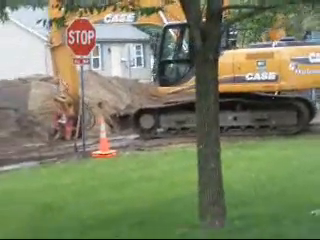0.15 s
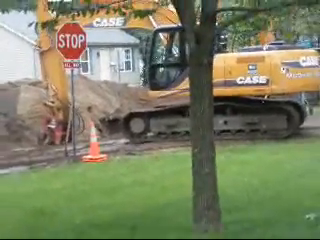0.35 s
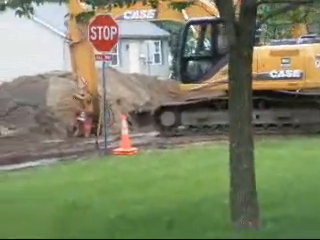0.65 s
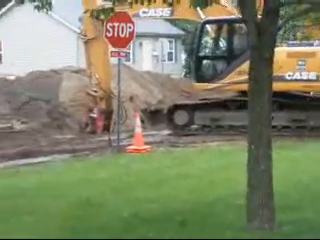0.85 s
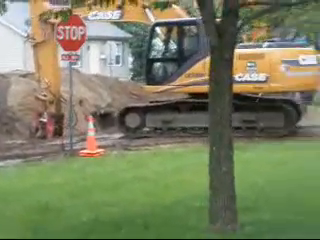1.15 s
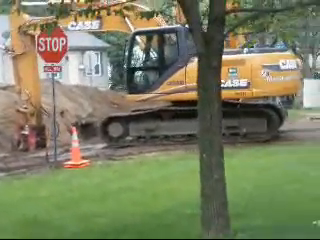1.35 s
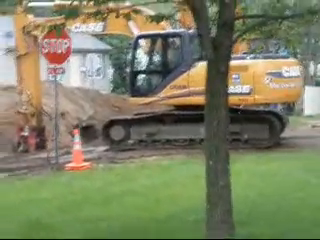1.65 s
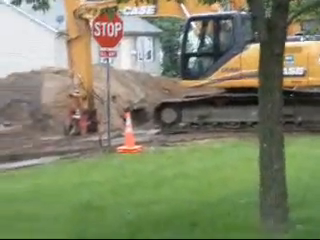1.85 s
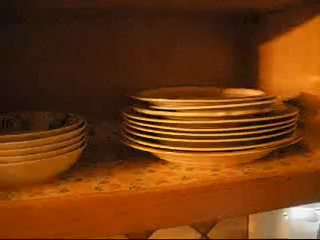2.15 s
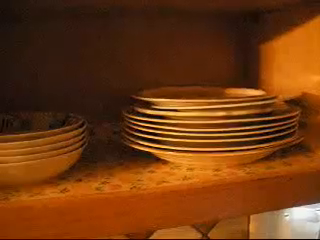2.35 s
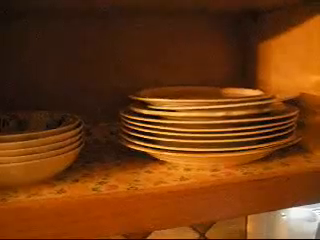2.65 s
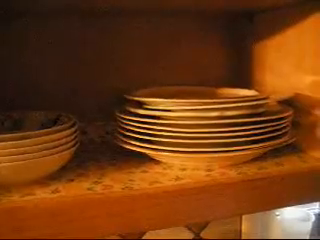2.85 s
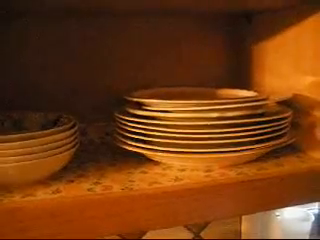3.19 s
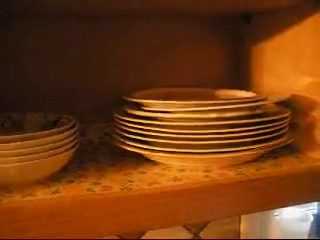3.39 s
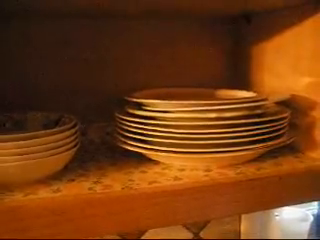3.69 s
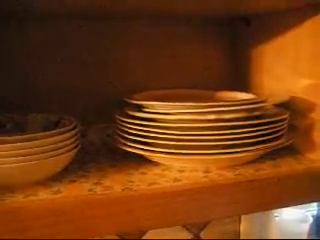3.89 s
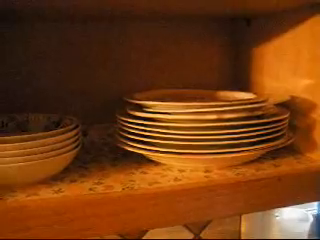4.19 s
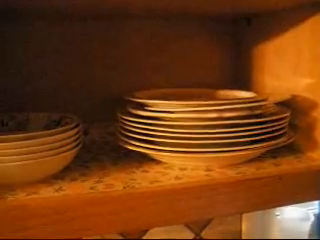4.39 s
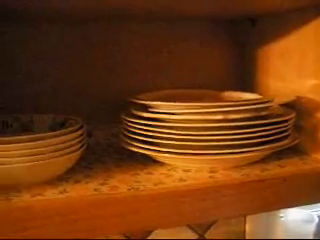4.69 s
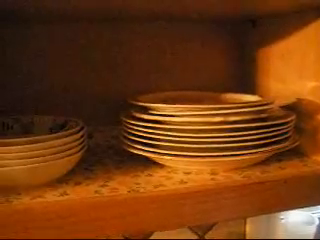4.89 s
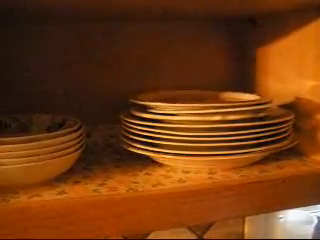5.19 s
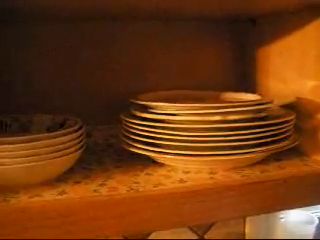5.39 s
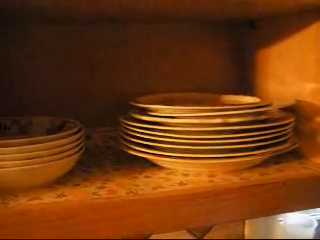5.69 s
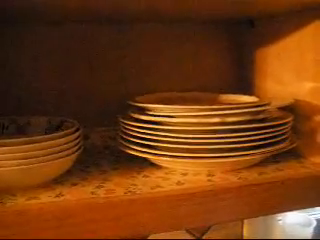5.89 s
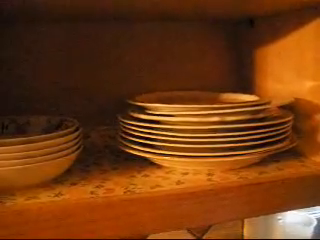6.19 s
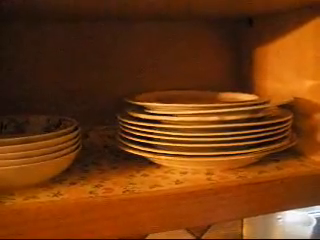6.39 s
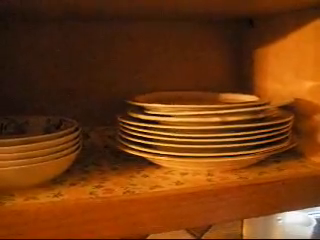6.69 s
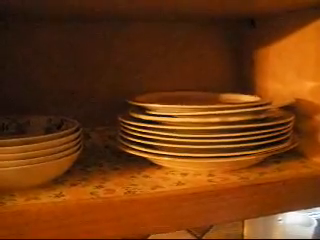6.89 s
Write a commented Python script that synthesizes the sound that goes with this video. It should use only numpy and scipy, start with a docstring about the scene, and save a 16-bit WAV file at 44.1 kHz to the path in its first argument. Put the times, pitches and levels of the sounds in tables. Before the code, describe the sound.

Outdoors, an excavator's vibrating hammer pounds at a rapid, blurred rate, loud and harsh, with chattering steel, sharp clanks, short squeaks and a whine as it slows. An abrupt cut goes inside a house: a stack of plates rattles quickly in a cupboard over a muffled drone, then fades to low hum and wood buzz before scattered clinks return. Small microphone, slightly clipped, with little deep bass.

```python
"""A vibrating hammer on an excavator pounds the ground: rapid blows, chattering steel, clanks, squeaks, a whine.
Then, abruptly, one hears the inside of a house: a drone through the wall and a rattling stack of plates.
The rattle dies away to the drone and the hum of an idling engine, then stray knocks return.
Blows, contacts and landings are impulses or noise bursts that excite resonances and coloured responses;
steady tones are sines that follow the blow rate, the shaking rate or an engine pitch."""
import sys
import numpy as np
from scipy import signal
from scipy.fft import rfft, irfft
from scipy.io import wavfile
from scipy.ndimage import uniform_filter1d

SR = 44100
rng = np.random.default_rng(int(sys.argv[2]) if len(sys.argv) > 2 else 0)


def digitize_waveform(pressure):
    """Quantize a signal to 16-bit integers and store it at the path in sys.argv[1].

    Rows of a 2-D input are taken as channels; values are limited to [-1, 1].
    """
    field = np.atleast_2d(pressure).T
    bounded = np.clip(field, -1, 1)
    quanta = np.round(bounded * 32767).astype(np.int16)
    wavfile.write(sys.argv[1], SR, quanta)


N = 310905
T = np.arange(N) / SR  # time in s

CUT_S = 2.216  # the street gives way to the house
# Resonances of the steel housing: centre_hz, width_hz, level_db (relative)
HOUSING_MODES = [(610, 51, -18), (740, 25, 0), (879, 96, 6.5), (1264, 450, 5.5), (1817, 25, 8)]
# Spectrum of the ground's response: frequency_hz, level_db (relative)
GROUND_SPECTRUM = [(30, -77), (50, -26), (70, -12), (100, 3), (175, 3.5), (240, 1), (330, 6.5), (480, 4.5),
                   (800, 14), (2000, -54)]
# Spectrum of loose steel: frequency_hz, level_db (relative)
STEEL_SPECTRUM = [(150, -26), (450, -4), (800, 5), (1020, -4.5), (1350, 2), (1850, 0.5), (2400, -3),
                  (3050, -9.5), (3550, -8), (4000, -11), (5100, -11.5), (6200, -9), (10000, -13),
                  (12500, -24)]


def undb(db):
    """Logarithmic level: decibels become an amplitude ratio."""
    return 10 ** (np.asarray(db) / 20)


def unit(x):
    """Normalisation of mean power: scale to rms 1."""
    return x / np.sqrt(np.mean(x ** 2))


def curves(table):
    """Linear interpolation: the columns of a table as curves over the time in its first column."""
    s, *columns = np.transpose(table)
    return [np.interp(T, s, column) for column in columns]


def ramp(start_s, length_s):
    """Linear envelope: a straight rise from 0 to 1."""
    return np.clip((T - start_s) / length_s, 0, 1)


def swell(start_s, attack_s, hold_s, release_s):
    """Trapezoidal envelope: attack, hold and release, from 0 to 1 and back."""
    return ramp(start_s, attack_s) - ramp(start_s + attack_s + hold_s, release_s)


def walk(rate):
    """Low-pass noise: random levels held for 1 / rate s, then smoothed twice by a moving average."""
    hold = int(SR / rate)
    held = rng.standard_normal(size=1000)[np.arange(N) // hold]
    return 1.3 * uniform_filter1d(uniform_filter1d(held, hold), hold)


def tone(hz):
    """Phase is the integral of frequency: a sine of rms 1 that follows a pitch curve."""
    cycles = np.cumsum(hz) / SR + rng.random()
    return np.sqrt(2) * np.sin(2 * np.pi * cycles)


def through(x, response):
    """Linear filtering: convolve a sound with an impulse response."""
    return signal.fftconvolve(x, response)[:len(x)]


def colour(points, size=4096):
    """Minimum phase by folding the cepstrum: a causal impulse response with the given spectrum."""
    hz, db = np.transpose(points)
    f = np.maximum(np.arange(size // 2 + 1) * SR / size, 1)
    magnitude = undb(np.interp(np.log(f), np.log(hz), db))
    cepstrum = irfft(np.log(magnitude))
    cepstrum[1:size // 2] *= 2
    cepstrum[size // 2 + 1:] = 0
    return irfft(np.exp(rfft(cepstrum)))


def ring(modes, size=6000):
    """Modal superposition: damped sines, each decaying faster the wider its resonance."""
    t = T[:size]
    response = np.zeros(size)
    for hz, width, db in modes:
        response += undb(db) * width * np.exp(-np.pi * width * t) * np.sin(2 * np.pi * hz * t)
    return response


def echoes(t60, wet_db, size=22050):
    """Diffuse reverberation: the direct sound and a noise tail falling 60 dB in t60 seconds."""
    t = T[:size]
    tail = rng.standard_normal(size) * np.exp(-np.log(1000) * t / t60) * (1 - np.exp(-t / 0.0079))
    return (t == 0) + undb(wet_db) * tail / np.linalg.norm(tail)


def smear(x, t60, wet_db):
    """All-pass dispersion: many paths spread a sound in time without colouring it."""
    paths = rfft(echoes(t60, wet_db), N)
    return irfft(rfft(x) * paths / np.abs(paths), N)


def contacts(per_s, spread_db):
    """Random point process: a stream of tiny collisions of either sign and uneven strength."""
    happens = rng.random(N) < per_s / SR
    sign = rng.choice([-1, 1], N)
    return happens * sign * undb(spread_db * np.minimum(rng.exponential(size=N), 4))


def add(out, s, sound):
    """Superposition: mix a sound in at time s."""
    i = max(int(s * SR), 0)
    out[i:i + len(sound)] += sound[:max(N - i, 0)]


def idling_engine():
    """Narrow-band lines: mains hum and idling engine as tones of wavering level and pitch."""
    # frequency_hz, level_db (rms before wavering)
    lines = [(59.6, -56), (269.2, -57), (538.3, -58.5), (592.2, -88), (815, -60)]
    return sum(undb(db + 2 * walk(4.37)) * tone(hz * (1 + 0.00638 * walk(12))) for hz, db in lines)


def ground_hum(rate):
    """Harmonic radiation: tones at whole multiples of the shaking rate."""
    # multiple of the shaking rate, level_db (relative)
    orders = [(3, -7), (4, 0.5), (7, -15), (8, -23), (9, -17)]
    return unit(sum(undb(db + 0.42 * walk(8.1)) * tone(k * rate) for k, db in orders))


def wall_drone():
    """Transmission loss: noise coloured by the wall, its level wandering slowly."""
    # Sound through the wall: frequency_hz, level_db (relative)
    wall_spectrum = [(25, -18), (45, -16), (70, -7), (140, -1.5), (200, -4), (270, 2.5), (350, 1.5),
                     (470, -5), (590, 1.5), (690, -5.5), (820, -5.5), (1100, -5.5), (2500, -22.5)]
    return unit(through(rng.standard_normal(N), colour(wall_spectrum))) * undb(walk(6.8))


def woodwork_buzz(shake):
    """Intermittent contact: shaken joints strike the resonances of boards and doors."""
    # Cupboard boards and doors: centre_hz, width_hz, level_db (relative)
    wood_modes = [(864, 69, 9), (954, 44, 9), (1180, 89, 11), (1482, 310, 11.5), (1640, 130, 1.5),
                  (1890, 53, 3), (2440, 60, -43.5)]
    return unit(through(shake * contacts(per_s=1800, spread_db=1.5), ring(wood_modes)))


def fine_fizz(shake):
    """Broadband excitation: steady noise and shaken contacts share one coloured spectrum."""
    # frequency_hz, level_db (relative)
    fizz_spectrum = [(800, -14.5), (2400, 2), (4000, -4.5), (6500, -3.5), (9500, -5), (12500, -20.5)]
    grains = unit(contacts(per_s=1600, spread_db=4.5))
    return unit(through(rng.standard_normal(N) + 0.7 * shake * grains, colour(fizz_spectrum)))


def house(shake_s=2.318, fizz_db=-0.5, fizz_follows=.3):
    """Structure-borne sound: drone and hum pass wall and floor, and contacts buzz at the shaking rate."""
    # How hard the machine shakes the house: time_s, drone_db (relative)
    drone_levels = [(2.32, -44.5), (2.45, -43), (3.6, -44.5), (4.2, -44.5), (4.66, -46.5), (5.15, -50.5),
                    (5.84, -50.5), (5.93, -44.5), (6.06, -45), (6.25, -40), (6.57, -38.5), (6.8, -45),
                    (7.05, -44.5)]
    # Woodwork wedges tight, then loosens in surges: time_s, buzz_db (relative to the drone)
    looseness = [(2.9, 0), (3.3, -4.5), (3.95, -8), (4.03, 5.5), (4.4, 1.5), (4.67, 6.5), (4.8, 0),
                 (7.05, 1)]
    # time_s, shaking_rate_hz, hum_db (rms of the ground hum)
    shaking = [(2.3, 32.66, -68), (3.9, 32.9, -53.5), (4.65, 36.95, -53), (4.9, 35.05, -63),
               (5.95, 31, -61.5), (6.27, 31.73, -46.5), (7.05, 35.82, -42.5)]
    drone_db, loose_db = curves(drone_levels) + curves(looseness)
    rate, hum_db = curves(shaking)
    shake = 1 + 0.06 * np.cos(2 * np.pi * np.cumsum(rate) / SR)
    shaken = wall_drone() * undb(drone_db + 3.0)
    shaken += woodwork_buzz(shake) * undb(drone_db + loose_db + 1)
    # the fizz follows only a share of the looseness
    shaken += fine_fizz(shake) * undb(drone_db + fizz_follows * loose_db + fizz_db)
    shaken += ground_hum(rate) * undb(hum_db)
    return shaken * undb(np.where(T < shake_s, -10, 0)) + idling_engine()


def landings(start_s=2.3782, period_s=.06055, end_s=4.16, rebound_s=.021, rebound_db=-12, late_s=.0028):
    """Periodic impact with rebound: (time_s, relative level_db) of rocking landings, then stray knocks."""
    # time_s, full_db (relative), weak_shortfall_db, weak_rebound_db (relative to a full landing)
    rocking = [(2.38, -16.5, -1, -6), (2.45, -18.5, -1.5, -1.5), (2.62, -16.5, 6, -1),
               (2.75, -16.2, 5.5, -3.5), (2.87, -17, 16, -3), (3.0, -14, 11, -13), (3.22, -14.5, 19.5, -13),
               (3.29, -17.5, 12, -25), (3.4, -25.5, 1, -15), (3.58, -28.5, -1, -7), (3.72, -26, 0, -18),
               (3.97, -25, 2, -12), (4.08, -33.5, 3.5, -15)]
    # Stray knocks of unsteady shaking: time_s, level_db (relative)
    knocks = [(4.1713, -26), (6.337, -19), (6.4004, -22), (6.434, -23), (6.4919, -14), (6.5244, -14),
              (6.5601, -12), (6.6248, -22), (6.6762, -18.5), (6.7044, -29), (6.7406, -19), (6.8678, -25.5),
              (6.9571, -25.5), (6.9885, -25.5), (7.0112, -20), (7.0384, -26)]
    full_db, limp_db, catch_db = curves(rocking)
    hits = []
    for beat, s in enumerate(np.arange(start_s, end_s, period_s)):
        i = int(s * SR)
        if beat % 2:
            hits += [(s, full_db[i]), (s + rebound_s, full_db[i] + rebound_db)]
        else:
            # the weaker this landing, the later it comes and the sooner its rebound
            late = late_s * (1 - undb(-limp_db[i]))
            hits += [(s + late, full_db[i] - limp_db[i]), (s + rebound_s - late, full_db[i] + catch_db[i])]
    return hits + [(s, db - 0.1) for s, db in knocks]


def plates(size=5000, split_hz=2400, treble_db=-19.5, low_db=-24, shelf_db=-51.5, soft_dulling=0.097):
    """Multiple impact: a landing is a burst of touches, exciting plate and shelf modes and reverberation."""
    # Plates: centre_hz, width_hz, level_db (relative)
    plate_modes = [(900, 17, -40), (940, 53, 10.5), (1298, 23, 13.5), (1525, 49, 7), (1900, 20, 8),
                   (1980, 21, 10.5), (2233, 22, 2.5), (2460, 21, 0), (3015, 180, -7), (3525, 100, 2),
                   (3990, 49, -12), (4556, 85, 0), (5090, 31, -4), (5520, 17, -17), (6100, 12, 1),
                   (6340, 13, -9.5), (6800, 23, -6), (7700, 30, 0), (8700, 50, -6), (9400, 45, -29),
                   (10000, 34, -8.5), (11260, 28, -8.5), (11600, 36, -5.5), (11700, 74, -25)]
    # Tuning of each plate: frequency ratio
    plate_tuning = [.984, .995, 1.004, 1.015]
    # Shelf under the plates: centre_hz, width_hz, level_db (relative)
    shelf_modes = [(765, 47, 3), (787, 61, -6.5), (1260, 73, -5)]
    bright, dull, t = np.zeros(N), np.zeros(N), T[:size]
    stack = [ring([(hz * ratio, width, db) for hz, width, db in plate_modes]) for ratio in plate_tuning]
    shelf = ring(shelf_modes)
    lows = signal.butter(3, split_hz, "low", fs=SR, output="sos")
    highs = signal.butter(3, split_hz, "high", fs=SR, output="sos")
    tick = colour([(400, -38), (900, 6), (2800, 2.5), (5200, -1.5), (6000, -6), (12000, -6.5)])
    landing = (1 - np.exp(-t / 0.0004)) * np.exp(-(t / 0.007) ** 2) + 0.11 * np.exp(-t / .025)
    hits = landings()
    hardest_db = max(db for s, db in hits)
    for s, db in hits:
        shape = (len(stack), size)
        touches = rng.standard_normal(shape) * (rng.random(shape) < .08) * landing
        all_touches = touches.sum(axis=0)
        china = sum(through(touch, plate) for touch, plate in zip(touches, stack))
        # the glaze clacks at once, then the plates ring
        knock = unit(china) + 0.52 * unit(through(all_touches, tick))
        add(bright, s - .001, undb(db + treble_db) * unit(signal.sosfilt(highs, knock)))
        # a softer knock keeps more of its low ring, in dB per dB
        kept_db = soft_dulling * (hardest_db - db)
        add(dull, s - .001, undb(db + low_db + kept_db) * unit(signal.sosfilt(lows, knock)))
        # the weight thumps the shelf equally, however gently the plates touch
        add(dull, s, undb(shelf_db) * unit(through(all_touches, shelf)))
    # the lows get the stronger but shorter reverberation
    return through(bright, echoes(t60=0.22, wet_db=-13)) + through(dull, echoes(t60=0.18, wet_db=-5))


def squeaks(sag=0.0074):
    """Stick-slip friction: dry steel pins give short, rough squeals that sag in pitch."""
    # start_s, length_s, pitch_hz (centre), level_db (before the fades)
    squeals = [(.01, 0.057, 1822, -19.5), (.08, 0.071, 605, -21), (0.146, 0.064, 1297, -23),
               (.39, 0.18, 1210, -25.5), (0.736, 0.13, 649, -22.5), (.97, 0.107, 1830, -29),
               (1.063, 0.15, 588, -25.5), (1.681, 0.029, 2100, -18)]
    out = np.zeros(N)
    for s, length, pitch_hz, db in squeals:
        n = int(length * SR)
        # starts above its pitch by the share sag, and ends as far below
        hz = pitch_hz * (1 + sag * np.linspace(1, -1, n) + 0.016 * walk(79)[:n])
        add(out, s, undb(db) * signal.windows.tukey(n) * tone(hz))
    return out


def clanks(size=3000, count=10, decay_s=0.0044, clank_db=-2.5, small_db=-11.5, small_spread_db=-3):
    """Impact excitation: a pin crosses the play in its bearing and jolts steel, housing and soil."""
    # Loudest clanks of loose steel: time_s, peak_db (relative)
    loudest = [(0.08, 0), (0.127, -1), (0.132, -1), (0.168, -6), (0.252, -4), (0.299, -1.5), (0.324, -3),
               (0.393, -8), (0.402, 4.5), (0.45, 0.5), (1.028, 0), (1.196, -3), (1.69, 1), (2.04, -0.5)]
    steel, housing, soil = colour(STEEL_SPECTRUM), ring(HOUSING_MODES), colour(GROUND_SPECTRUM)
    out = np.zeros(N)
    # smaller jolts fall at random
    small = [(CUT_S * rng.random(), small_db + small_spread_db * rng.standard_normal()) for _ in range(count)]
    for s, db in list(loudest) + small:
        scrape = rng.standard_normal(size) * np.exp(-T[:size] / decay_s)
        clank = unit(through(scrape, steel))
        clank += 0.37 * unit(through(scrape, housing))
        clank += 0.54 * unit(through(scrape, soil))
        add(out, s, clank / np.abs(clank).max() * undb(db + clank_db))
    return out


def motor_whine(rate):
    """Order tracking: the motor whines twenty times a turn, louder while it labours."""
    whine_db = -36.5 + 10 * swell(start_s=1.06, attack_s=.12, hold_s=0.49, release_s=.35)
    return undb(whine_db + 2.5 * walk(40.13)) * tone(20 * rate * (1 + 0.0151 * walk(70)))


def panel_song(rate, panel_hz=722, width_hz=50, level_db=-24):
    """Resonance: as the hammer slows, two high overtones slide into a panel resonance and sing."""
    song = np.zeros(N)
    for hz in (23 * rate, 24 * rate):
        response = 1 / (1 + ((hz - panel_hz) / width_hz) ** 2) ** 2
        song += undb(level_db + 3.1 * walk(9.25)) * tone(hz * (1 + 0.0059 * walk(50))) * response
    return song


def firm_ground_bite(rate, firm, loose_db=-5.5, firm_db=-1.5):
    """Periodicity gives harmonics: firm ground makes the stroke repeat cleanly, raising its low tones."""
    # multiple of the blow rate, level_db (relative)
    orders = [(3, -48), (4, -41.5), (5, -38), (6, -37.5), (9, -37.5), (15, -35.5)]
    bite_db = loose_db + (firm_db - loose_db) * firm
    return sum(undb(db + bite_db + 2 * walk(4.1)) * tone(k * rate) for k, db in orders)


def hammer(free_hz=38.07, firm_hz=31, hunt=.012):
    """Periodic forcing: each turn of the eccentric weight slams the plate down and rattles loose steel."""
    # The hammer slows as the ground firms up: time_s, blow_rate_hz (before wandering), thud_db (relative)
    blow_curve = [(0, 38, -26), (.5, 38, -30), (.85, 37.6, -26.5), (1.28, 35.7, -32.5), (1.55, 34.1, -25.5),
                  (1.75, 32, -25.5), (1.9, 31, -39), (2.2, 30.8, -25.5)]
    rate, thud_db = curves(blow_curve)
    # 0 at the blow rate of loose ground, 1 at that of firm ground
    firm = np.clip((free_hz - rate) / (free_hz - firm_hz), 0, 1)
    # the rate wanders most on loose ground
    rate = rate * (1 + (.002 + hunt * (1 - firm) ** 2) * walk(20))
    turns = np.cumsum(rate) / SR
    blows = np.diff(np.floor(turns), prepend=0) * undb(1.3 * walk(30))
    # the same train of knocks runs through boom and ground on every turn
    repeats = unit(smear(blows, t60=0.12, wet_db=22.5))
    # joints rattle at both ends of the stroke
    stroke = 1 + 0.19 * np.cos(2 * np.pi * turns) + 0.16 * np.cos(2 * np.pi * 2 * turns)
    rattle = unit(smear(stroke * contacts(per_s=1700, spread_db=2.5), t60=0.068, wet_db=-1.5))

    thud = unit(through(repeats + 1.66 * rattle, colour(GROUND_SPECTRUM))) * undb(thud_db + 2.0)
    # the housing rises as the excavator's boom leans on the hammer
    body_db = -29 + 7.5 * ramp(start_s=0.54, length_s=0.15)
    body = unit(through(repeats + 0.86 * rattle, ring(HOUSING_MODES))) * undb(body_db)
    # the chatter surges unevenly on loose ground
    chatter_db = -15 - 1.06 * firm + 1.27 * (1 - firm) * walk(24.65)
    chatter = unit(through(rattle + 0.57 * repeats, colour(STEEL_SPECTRUM))) * undb(chatter_db)
    # the ground booms at 110 Hz, 24 Hz wide, while the hammer drives deepest
    boom = unit(through(repeats + rattle, ring([(110, 24, 0)]))) * undb(-38)
    boom *= swell(start_s=1.25, attack_s=.2, hold_s=.25, release_s=.15)
    return thud + boom + body + chatter + firm_ground_bite(rate, firm) + motor_whine(rate) + panel_song(rate)


def scene(radiate_hz=92):
    """Radiation and superposition: the street first, then the house, joined by a very short crossfade."""
    # the plate is too small to radiate its slowest motion
    radiation = signal.butter(4, radiate_hz, "high", fs=SR, output="sos")
    street = signal.sosfilt(radiation, hammer() + clanks() + squeaks())
    outside = np.exp(-np.maximum(T - CUT_S, 0) / 0.0036)
    return (outside * street + (1 - outside) * (house() + plates()))[None]


def record(dry, notch_hz=8000, notch_q=3.6, top_hz=12300):
    """Band limiting: a small microphone with a hollow treble, little deep bass, hard clipping and no top."""
    heard = signal.lfilter(*signal.iirnotch(notch_hz, notch_q, fs=SR), dry)
    heard = signal.sosfilt(signal.butter(2, 40, "high", fs=SR, output="sos"), heard)
    clipped = np.clip(heard, -.88, .88)
    return signal.sosfilt(signal.ellip(8, .2, 70, top_hz, fs=SR, output="sos"), clipped)


dry = scene()
out = record(dry)
digitize_waveform(out)
```